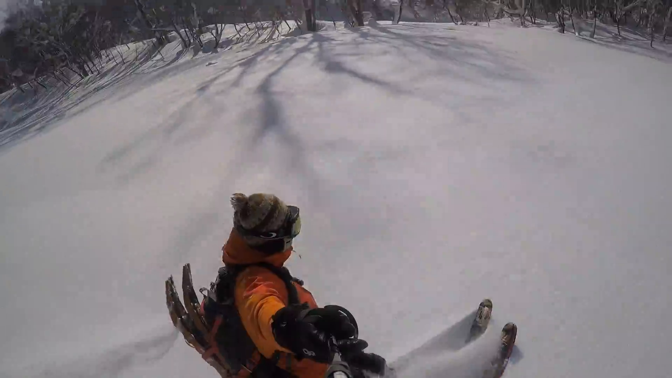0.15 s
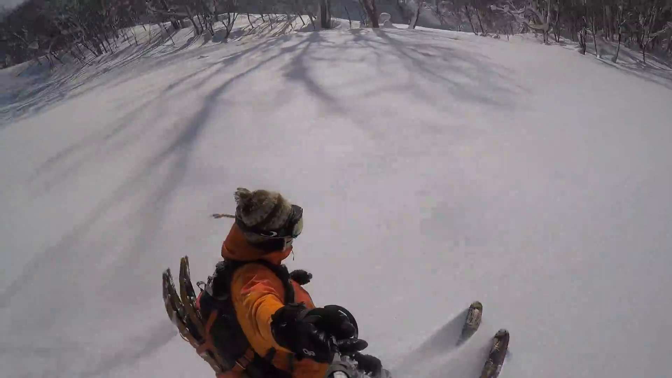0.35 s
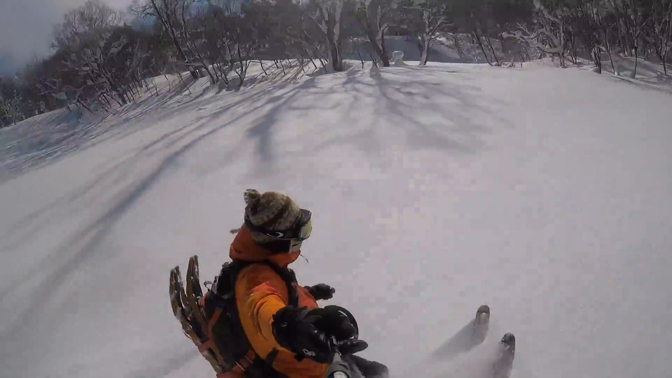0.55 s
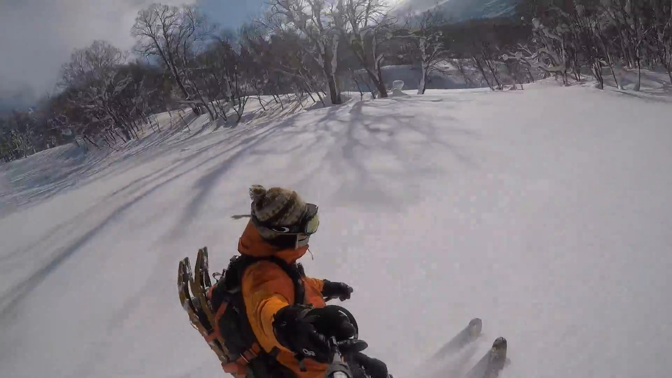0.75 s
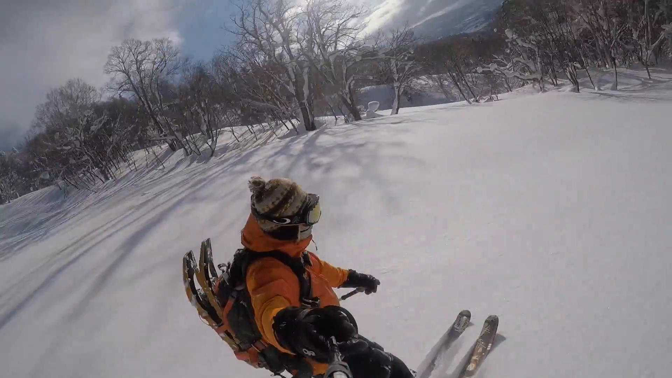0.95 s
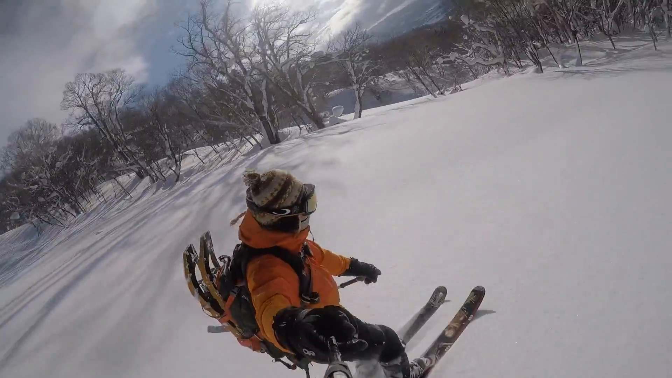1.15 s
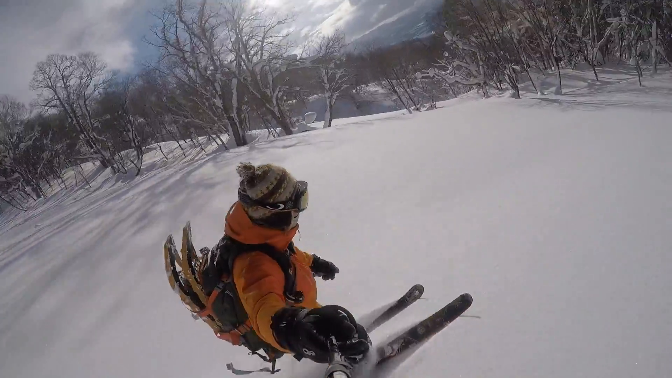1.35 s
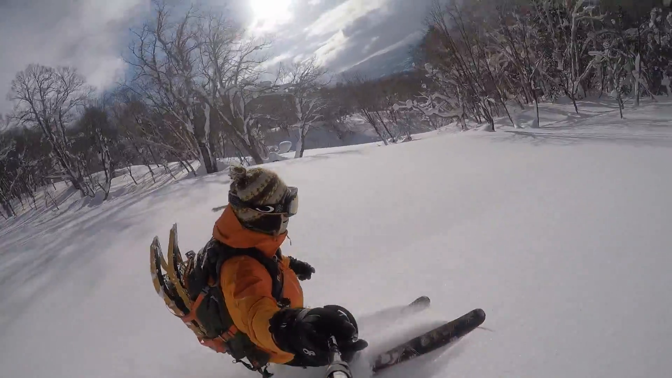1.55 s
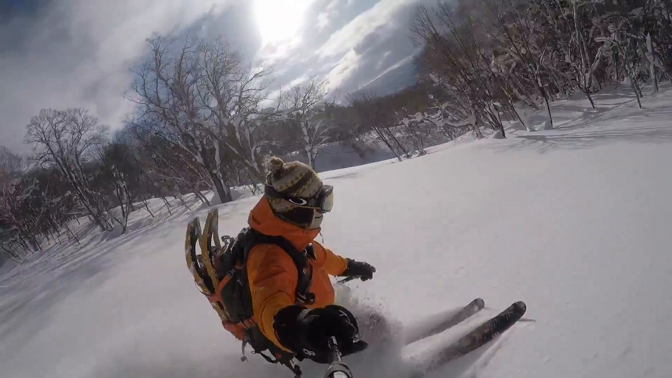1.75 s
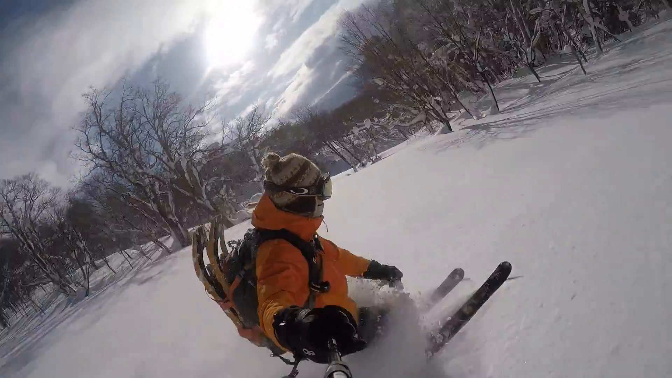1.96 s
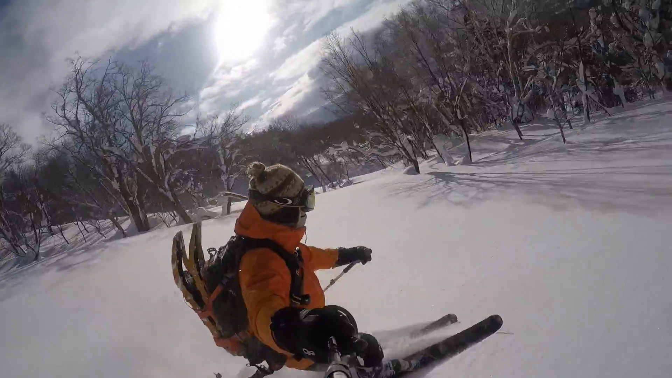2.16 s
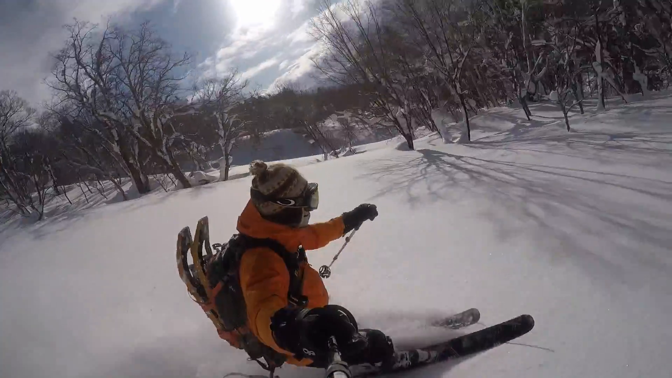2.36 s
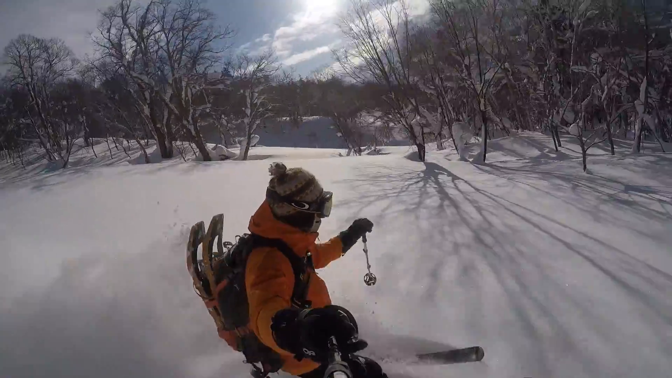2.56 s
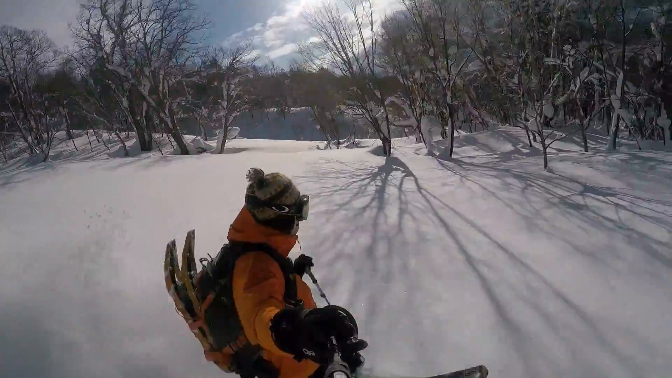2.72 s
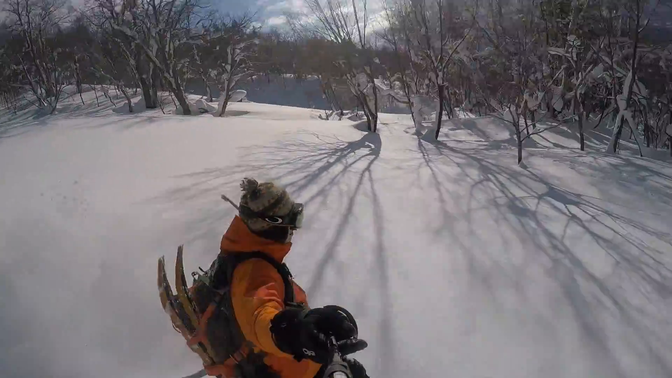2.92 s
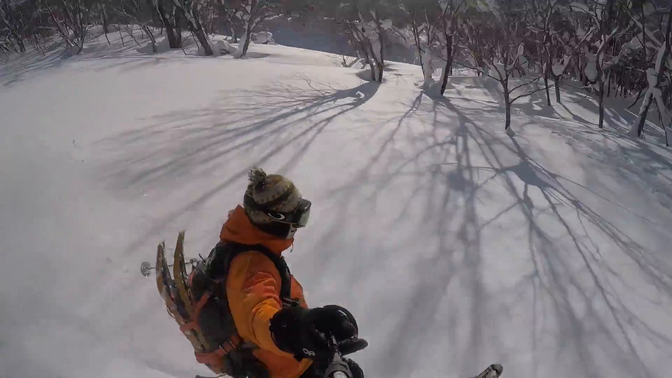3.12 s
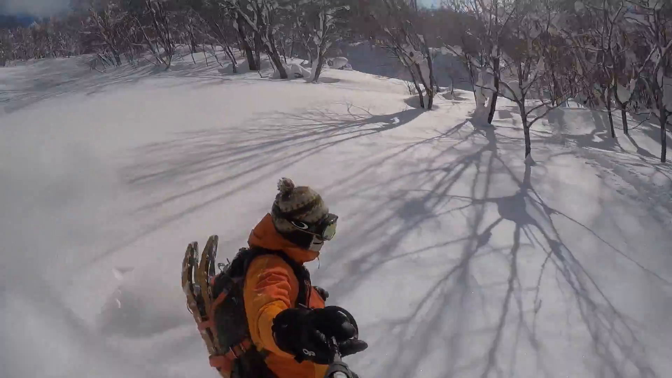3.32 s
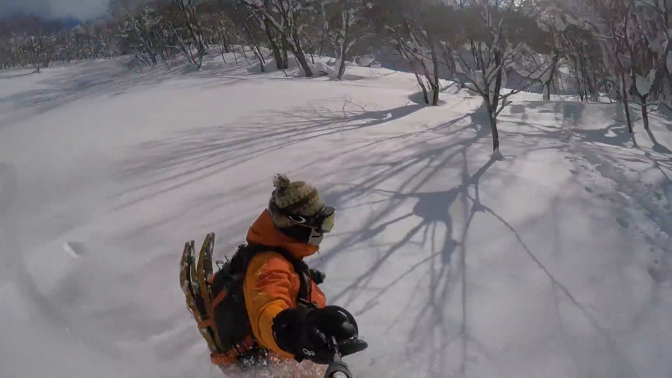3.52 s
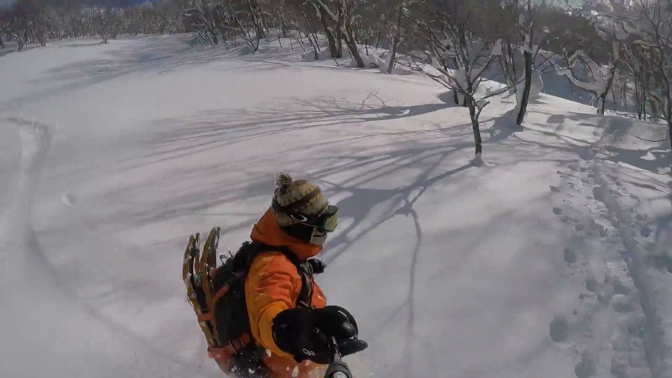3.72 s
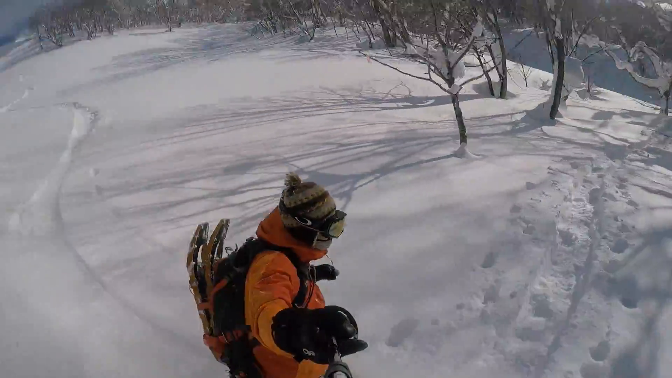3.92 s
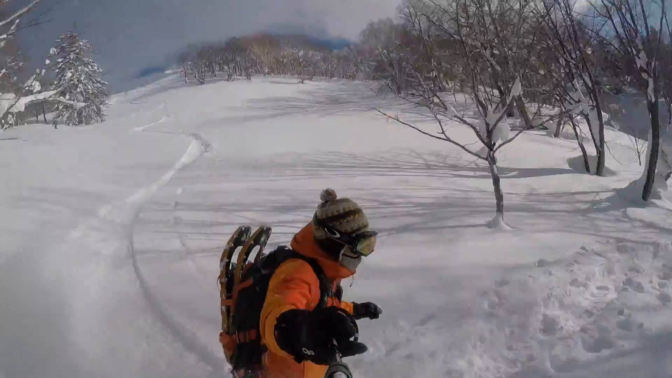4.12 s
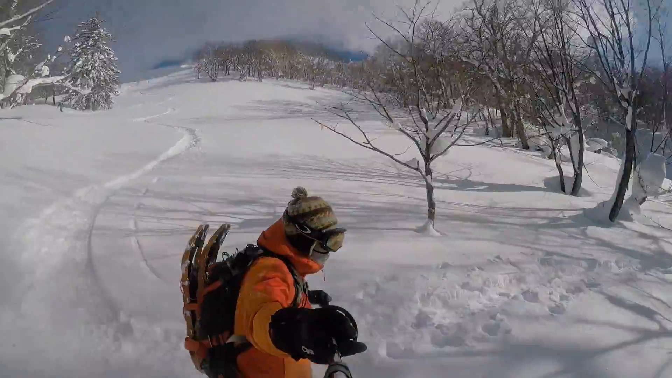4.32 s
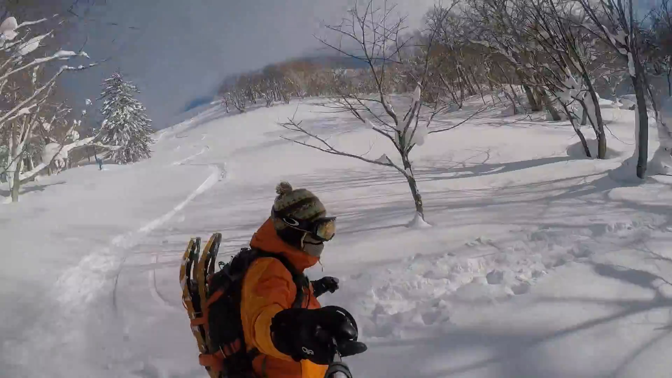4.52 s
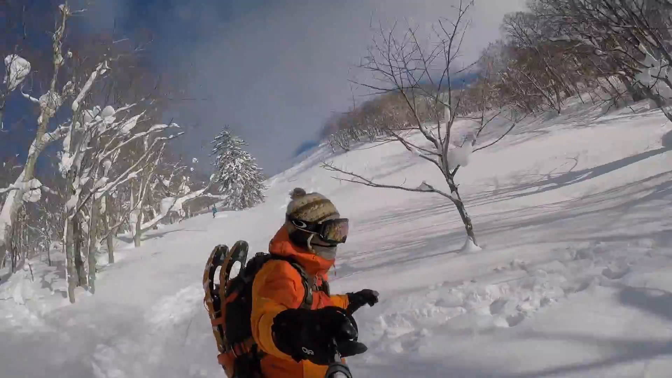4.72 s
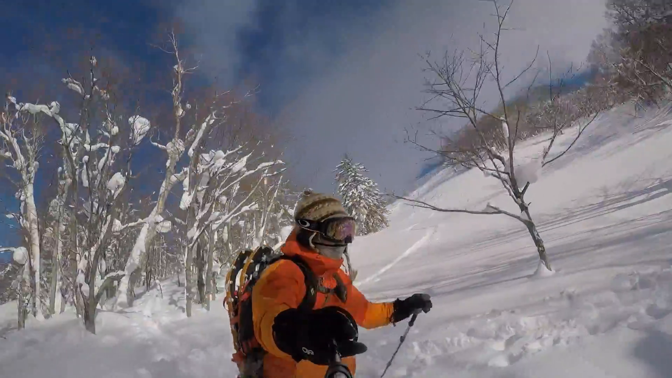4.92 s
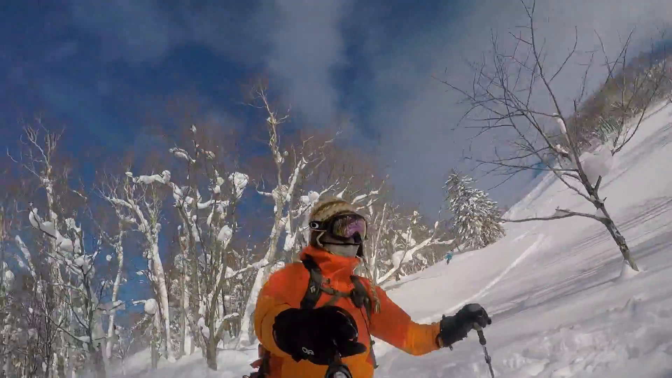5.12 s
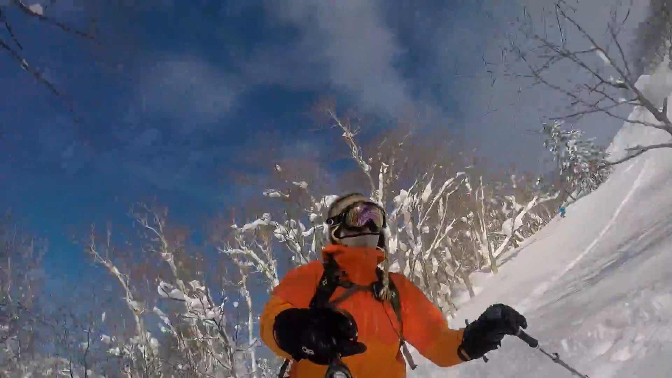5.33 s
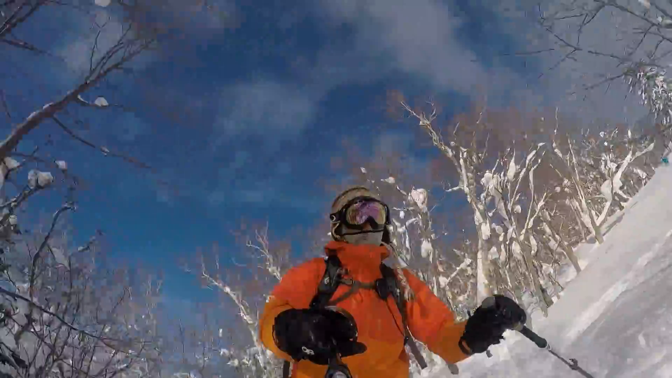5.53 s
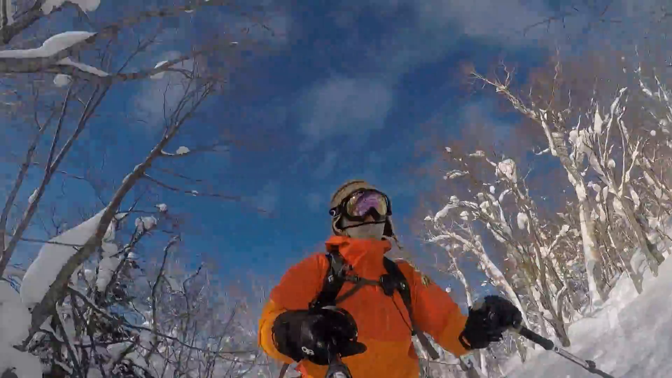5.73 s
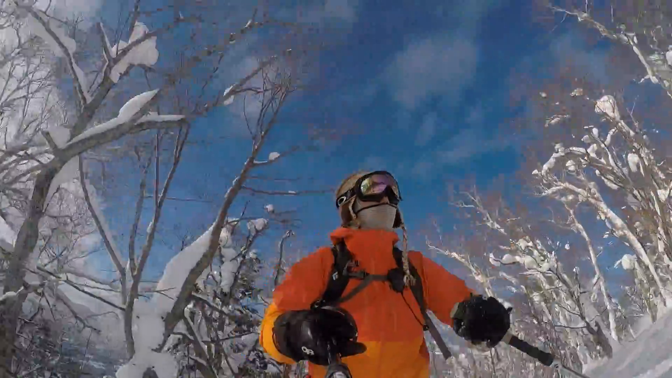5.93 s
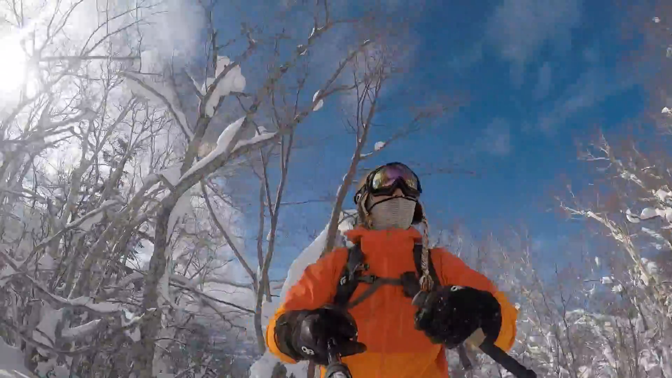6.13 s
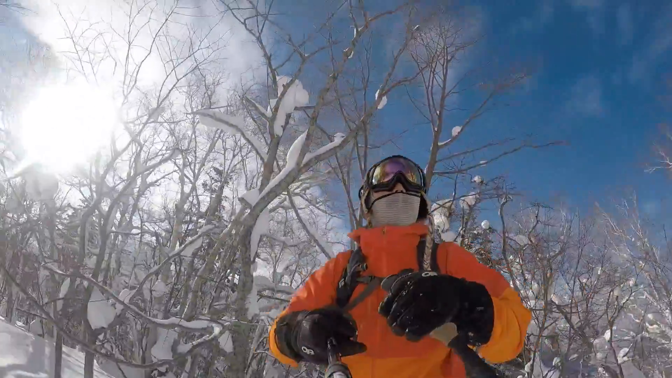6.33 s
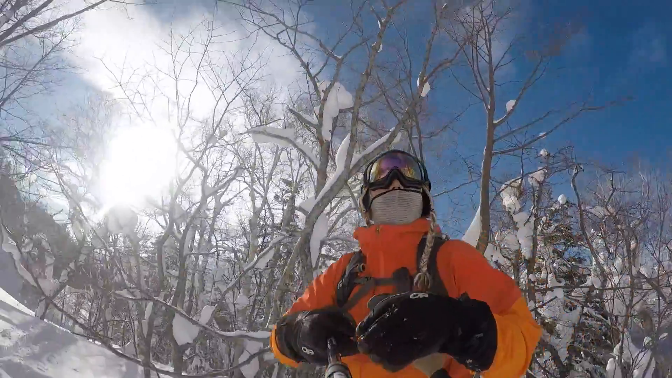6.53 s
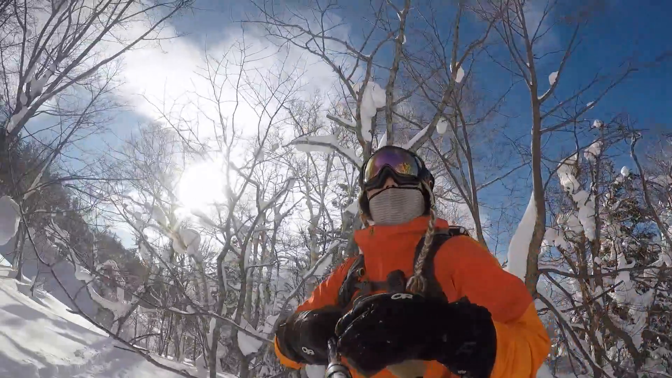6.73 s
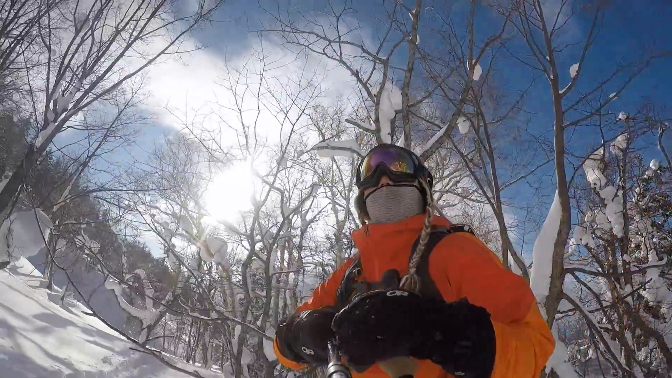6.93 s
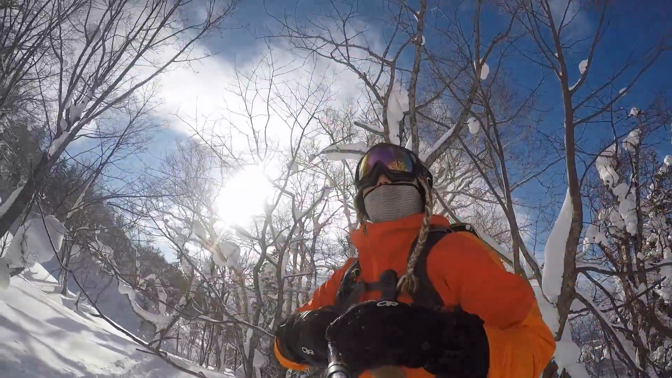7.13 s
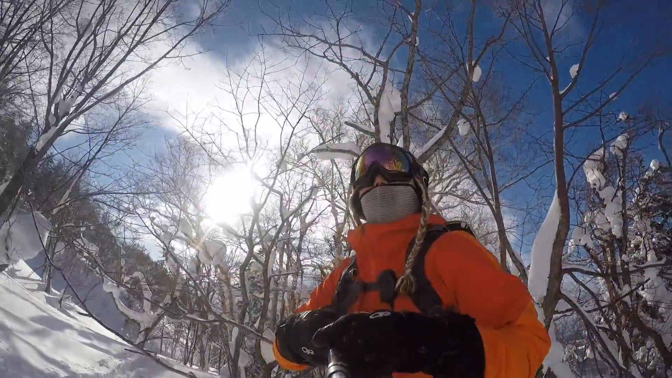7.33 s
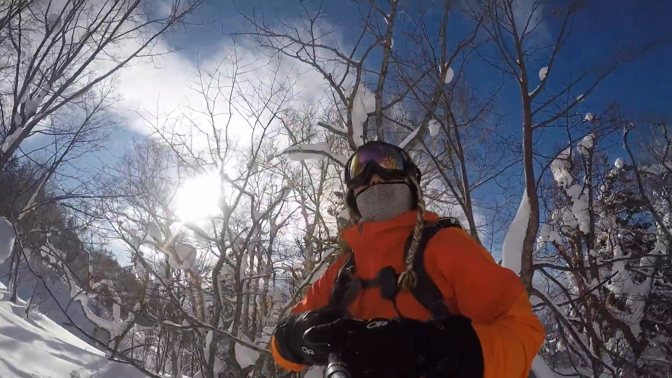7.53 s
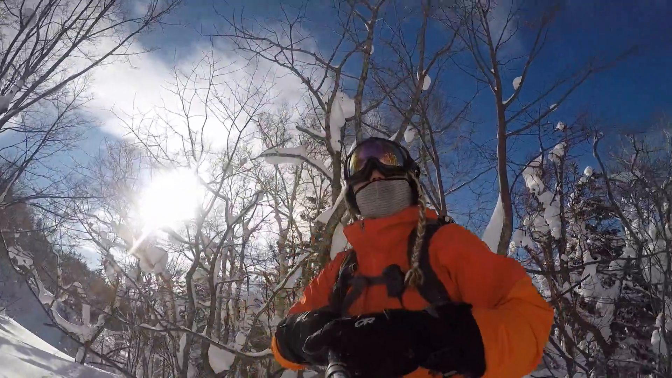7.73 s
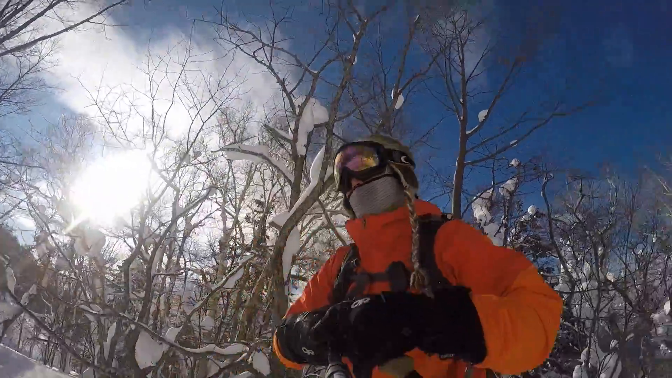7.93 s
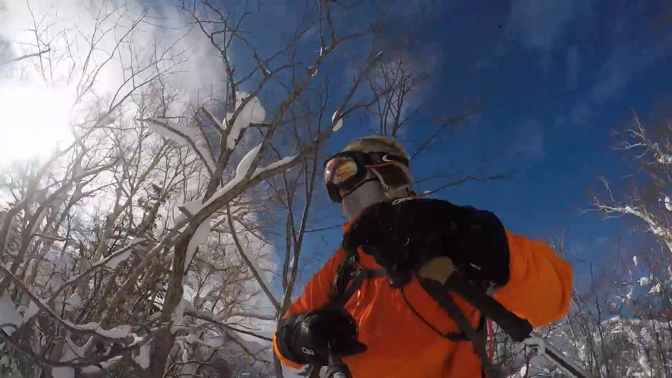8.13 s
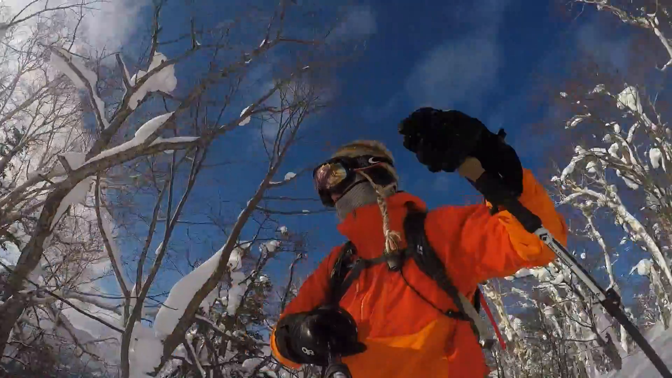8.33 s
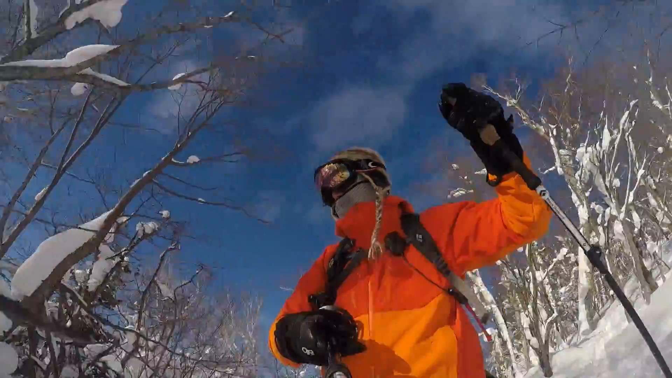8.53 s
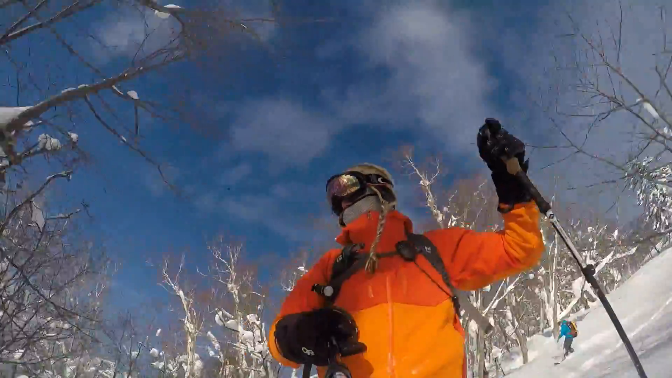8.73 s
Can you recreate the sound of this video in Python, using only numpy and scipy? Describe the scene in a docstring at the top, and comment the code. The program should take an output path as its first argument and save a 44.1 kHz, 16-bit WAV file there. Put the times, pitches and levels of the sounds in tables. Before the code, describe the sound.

Outdoors on a snowy slope, heard very close and dry from a camera on a hand-held pole. From 0 to about 4 seconds skis hiss through powder in soft grainy swells, strongest near 0, 0.4 and 3.1, with dull packing rush, low wind rumble and a wavering low hum. Small plastic clicks, muffled pole thumps and short snow crunches punctuate it, with a firmer knock near 1.9. A glove scuff and double knock come around 4.1, crunching snow at 4.4. The glide slows and fades by 5, leaving quiet wind, faint electronic hiss and slight jacket rustle. From 7.15 ribbed nylon zips over the pole, buzzing upward in pitch, until one sharp, very loud knock at 7.5; the rub drops away by 7.7. Cloth rustles near 7.8 and 8, then light clicks from 8.3 and a scuff with clicks at 8.7.

```python
"""Snow hisses under the skis of a skier turning through powder with a camera on a hand-held pole.
Filtered random grains make the snow and cloth; shaped noise and an unsteady sine make the wind and hum.
Decaying modes make the blows on the pole and clicks of its mount; resonant bands make the crunches.
As the skier slows, the jacket rustles, ribbed nylon zips over the pole as a train of snaps,
and one sharp knock shakes the case. A steady hiss and faint pulsing whine lie beneath."""
import sys
import numpy as np
from scipy import signal
from scipy.fft import rfft, irfft
from scipy.io import wavfile
from scipy.ndimage import uniform_filter1d, minimum_filter1d

SR = 44100
rng = np.random.default_rng(int(sys.argv[2]) if len(sys.argv) > 2 else 0)


def to_wav(s):
    """Save 16-bit WAV."""
    ch = np.atleast_2d(s).T  # columns
    pcm = np.round(np.clip(ch, -1, 1) * 32767)  # PCM
    wavfile.write(sys.argv[1], SR, pcm.astype(np.int16))


N = 390814
TIME = np.arange(N) / SR

# the skier slows to a gentle glide: time_s, speed_m_per_s
SKI_SPEED = [(0, 10), (.3, 9), (.9, 7.5), (1.4, 8), (2.3, 8), (3.05, 7.5), (3.4, 7), (3.7, 6.5), (4.2, 5.5),
             (5, 2)]
CRUISE_M_S = 8
# hiss as the skis are edged and released: peak_s, rise_s, fall_s, level_db
SKI_TURNS = [(0, .1, 0.15, -50.5), (.42, 0.26, 0.27, -49.5), (1.6, 0.14, .16, -53.5),
             (2.41, 0.16, 0.41, -54.5), (3.14, 0.23, 0.15, -51), (3.7, 0.33, 0.3, -61)]
# sheets of powder thrown past the camera: start_s, length_s, level_db
POWDER_SPRAYS = [(-.04, 0.094, -56), (1.44, 0.19, -60.5), (3.118, .225, -49)]
# spectrum of shearing snow crystals: frequency_hz, relative_db
SNOW_SPECTRUM = [(200, -23), (450, -21), (950, -10.5), (1280, -10.5), (1520, 0), (2050, 3.5), (2450, -1.5),
                 (2650, -3.5), (2900, -9), (3200, -4.5), (3650, -14), (4300, -12.5), (4900, -21),
                 (7400, -31.5), (14000, -48.5)]
# spectrum of thrown spray: frequency_hz, relative_db
SPRAY_SPECTRUM = [(1200, -35), (1800, 8.5), (2600, 0), (3250, 4), (3650, -4), (4300, 1), (4900, -13.5),
                  (5700, -7), (6700, -25.5), (9000, -37.5), (15000, -45)]
# spectrum of powder packing under the skis: frequency_hz, relative_db
PACKING_SPECTRUM = [(100, -9.5), (170, 1.5), (280, -4.5), (400, -15.5), (490, -2.5), (550, -8.5),
                    (750, -4.5), (830, -7), (980, -4), (1200, -18), (1500, -12.5), (3000, -45)]
# levels at cruising speed; amplitude grows as speed to these powers
RUN_DB, RUN_POWER = -69.5, 1.2
PACK_DB, PACK_POWER = -64.5, 2.9
SPRAY_SHARE_DB = -12  # fine spray that goes with all hiss
SPRAY_ATTACK_S, SPRAY_RELEASE_S = 0.039, 0.008

# gusts and swings of the pole through the air: peak_s, width_s, level_db
WIND_GUSTS = [(1.3, 0.27, -48), (1.82, .13, -41), (2.55, .07, -46), (3.3, .09, -42.5), (4.08, .11, -41.5),
              (4.65, .12, -48.5), (5.42, .09, -49), (5.85, .06, -48), (6.851, .14, -51.5),
              (7.35, .035, -38.5), (7.92, .05, -45), (8.76, .08, -50.5)]
# spectrum of wind rumble: frequency_hz, relative_db
WIND_SPECTRUM = [(10, -15), (20, -3), (45, 5.5), (80, 0), (100, -5), (125, -20.5), (160, -29), (220, -37),
                 (400, -38.5), (900, -80.5)]
# constant breeze, and headwind at cruising speed
BREEZE_DB, HEADWIND_DB, HEADWIND_POWER = -53.5, -45, 1.7
# eddies shed by the pole at cruising speed; they die away below the stall speed
EDDY_HZ, EDDY_DB, EDDY_DB_PER_OCTAVE, EDDY_STALL_M_S = 125.7, -56, -16, 4.9
EDDY_CALM_S, EDDY_CALM_DB = (.7, 2.3), -3  # the hum is weaker between these times

# movements of the arms that rub the jacket: peak_s, rise_s, fall_s, level_db
JACKET_RUBS = [(4.22, .15, 0.16, -70), (4.661, 0.055, 0.082, -65), (5.18, 0.044, 0.074, -75),
               (5.63, 0.055, 0.11, -74), (6.06, 0.018, .03, -75), (6.58, .04, .06, -69.5),
               (6.74, 0.033, 0.033, -67), (6.85, 0.014, 0.013, -60), (6.94, .02, 0.073, -67),
               (7.15, 0.039, 0.033, -67.5), (7.34, 0.035, .08, -54.5), (7.579, 0.089, 0.075, -63.5),
               (7.8, 0.056, 0.048, -54.5), (7.96, 0.027, 0.013, -51), (8.71, 0.018, 0.073, -54.5)]
# spectrum of jacket cloth: frequency_hz, relative_db
CLOTH_SPECTRUM = [(150, -22.5), (280, -9.5), (500, -12), (750, 0), (950, 2), (1280, -4), (1500, 3),
                  (1800, -0.5), (2050, -10), (2350, 2.5), (2700, -11.5), (3500, -13.5), (4200, -25.5),
                  (5100, -21), (6200, -37.5), (12000, -57.5)]
FIDGET_DB, FIDGET_SPREAD_DB, FIDGETS_PER_S = -85.5, 1, 6.4  # the jacket is never quite still

# spectrum of the steady hiss: frequency_hz, relative_db
HISS_SPECTRUM = [(120, -41), (200, -3.5), (443, -5), (775, -6.5), (1040, -17), (1600, 2.5), (2060, -22),
                 (2600, -5), (2850, -6.5), (8720, -15.5), (15000, -21)]
HISS_DB = -76
WHINE_HZ, WHINE_PULSE_HZ, WHINE_DB = 8560, 30, -97  # the camera's electronics

# blows through the pole: start_s, level_db, thump_relative_db, crack_relative_db
POLE_KNOCKS = [(0.705, -39.5, 9.5, -37), (1.516, -39, 2, -30), (1.745, -41.5, -15, -19),
               (1.917, -24.5, -9, -34), (2.856, -30.5, -24, -26), (3.831, -40, -8, -9),
               (4.143, -36, 8.5, -30), (4.1496, -32, 3.5, 2.5), (4.211, -48.5, 18.5, -30),
               (5.203, -53, -8, -17), (6.278, -54, 2, -27), (6.904, -48, -18, -20), (7.5323, -1, -7, -12.5)]
# modes of the case and pole when struck hard: frequency_hz, level_db, t60_s
POLE_MODES = [(170.6, -8, 0.12), (245, -13, 0.021), (285.4, -5, 0.063), (363, -8.5, 0.071),
              (509, -8.5, 0.081), (778, 1.5, 0.056), (929, 13, 0.028), (1008, 0.5, 0.054),
              (1127, -3, 0.061), (1416, -3, 0.047), (1750, 2, 0.024), (1807, -3, 0.033), (2240, -1, 0.022),
              (2630, -7, 0.027), (3080, -12.5, .016), (3405, -18.5, 0.015)]
# spectrum of a sharp contact: frequency_hz, relative_db
CRACK_SPECTRUM = [(500, -9), (1000, 5.5), (2700, 9.5), (4500, -10.5), (5800, -23.5), (6400, -22),
                  (8000, -26), (11000, -30), (15000, -37.5)]

# clicks of the mount and buckles: contact_s, level_db, treble_tilt_db_per_octave
MOUNT_CLICKS = [(1.3779, -29.5, 6.5), (1.7936, -35.5, -12), (2.133, -38.5, -11), (2.347, -29, 3.5),
                (2.4487, -29.5, 6.5), (2.9658, -35.5, -3), (3.3756, -28.5, 11), (3.872, -39.5, 2),
                (3.908, -43.5, 1), (3.9575, -30.5, 4.5), (4.321, -29, -1), (4.4836, -33.5, 1),
                (4.7244, -39.5, -13), (5.5764, -51.5, 10), (5.774, -44, -13.5), (5.8085, -47.5, -6),
                (6.976, -40, -16), (8.344, -44.5, 14), (8.3535, -39.5, 13), (8.4299, -37.5, -3),
                (8.6893, -26.5, -2), (8.7257, -28, -12)]
# modes of the mount when clicked: frequency_hz, level_db, t60_s
MOUNT_MODES = [(756, -20, 0.013), (1578, -8.5, 0.033), (1653, 0, 0.021), (2740, -3.5, 0.015),
               (2577, -1.5, 0.023), (3290, -16, 0.021), (4500, -18.5, 0.012), (4990, -30, 0.022)]
TICKS_PER_S, TICK_DB, TICK_SPREAD_DB, TICK_TILT_DB = 1.2, -59, 2.5, 6  # faint chance ticks of loose gear
CLICK_LIFT_DB = 9  # added to every click and tick

# snow crunching against the case and pole: start_s, length_s, level_db, low_ring_relative_db
SNOW_CRUNCHES = [(1.731, 0.036, -47.5, -9), (2.341, 0.046, -43.5, -5.5), (2.848, 0.033, -39.5, -9),
                 (3.37, 0.028, -44, -5.5), (4.424, 0.09, -51.5, -12.5), (4.454, 0.17, -50.5, -8),
                 (4.713, 0.035, -57.5, 5)]
# resonances of the case under crunching snow: frequency_hz, width_hz, level_db
CASE_BANDS = [(761, 47, 8), (1533, 204, 6.5), (2670, 74, 10.5), (3074, 150, 0.5), (4390, 150, -11.5)]
FRACTURES_PER_S, FRACTURE_SPREAD_DB = 1800, 2.2

# gloves scuffing on the grip: start_s, length_s, level_db
GLOVE_SCUFFS = [(4.134, 0.044, -43.5), (4.182, 0.066, -53), (8.689, 0.11, -46)]
# spectrum of glove on grip: frequency_hz, relative_db
GLOVE_SPECTRUM = [(100, -23), (230, -4), (500, -3.5), (920, 3), (1280, -2.5), (1600, 3), (2100, -9),
                  (2650, -5), (3600, -19.5), (4400, -32), (5250, -18.5), (5700, -42.5), (12000, -67)]

# ribbed nylon sliding: time_s, rib_rate_hz, level_db, roughness_0_to_1
NYLON_SLIDE = [(7.155, 211.2, -71.5, .08), (7.26, 223.7, -68, 0.3), (7.34, 246, -54.5, .45),
               (7.42, 275, -56.5, .35), (7.5, 325.2, -49, .2), (7.535, 342.3, -47.5, .22),
               (7.57, 326, -54, .22), (7.615, 232.6, -53, .9), (7.69, 187, -68, 0.8)]
# spectrum of rubbed nylon: frequency_hz, relative_db
NYLON_SPECTRUM = [(200, -23.5), (450, 1.5), (640, -4), (1000, -6.5), (1300, -31), (1650, -0.5),
                  (2250, -1.5), (2850, -3), (3400, -5), (4700, -10), (5600, -30), (7000, -23.5),
                  (8200, -43.5), (9700, -34), (14000, -49.5)]
THREAD_LAGS_S, THREAD_SMEAR = (.00043, .00079, .00131), .6
SING_HZ, SING_WIDTH_HZ, SING_GAIN = 3000, 160, .8  # the tube's resonance
SING_LIGHT_GAIN, SING_FADE_S = 6.8, (7.24, 7.34)  # freer before the cloth presses on and damps it

TOP_HZ = 15200  # upper edge of the recorded band


def undb(db):
    """Decibels are logarithmic: convert them to amplitude gain."""
    return 10 ** (np.asarray(db) / 20)


def unit(x):
    """Mean power sets level: scale to rms 1."""
    return x / np.sqrt(np.mean(x ** 2))


def together(gains):
    """Unrelated noises add in power."""
    return np.sqrt(sum(g ** 2 for g in gains))


def curves(table):
    """Linear interpolation turns each column of a timed table into a curve."""
    s, *columns = np.transpose(table)
    return [np.interp(TIME, s, c) for c in columns]


def during(table):
    """A smoothed gate opens and closes softly around a table's time span."""
    inside = (TIME >= table[0][0]) & (TIME <= table[-1][0])
    return uniform_filter1d(1. * inside, size=2000)


def colour(x, points):
    """A folded cepstrum gives a minimum-phase, causal filter of the given response."""
    hz, db = np.transpose(points)
    f = np.maximum(np.fft.rfftfreq(8192, 1 / SR), 1)
    response_db = np.interp(np.log(f), np.log(hz), db)
    cepstrum = irfft(np.log(undb(response_db)))
    half = len(cepstrum) // 2
    cepstrum[1:half] *= 2
    cepstrum[half + 1:] = 0
    impulse = irfft(np.exp(rfft(cepstrum)))[:half]
    return signal.fftconvolve(x, impulse)[:len(x)]


def band(x, hz, width):
    """A second-order resonance passes its centre at gain 1."""
    return signal.lfilter(*signal.iirpeak(hz, hz / width, fs=SR), x)


def walk(rate):
    """Averaging random steps gives smooth motion of rms 1."""
    k = max(int(SR / rate), 1)
    steps = np.repeat(rng.standard_normal(N // k + 1), k)[:N]
    return unit(uniform_filter1d(steps, k))


def grains(per_s, spread_db):
    """Friction and fracture are random impulses of very unequal size."""
    hit = rng.random(N) < per_s / SR
    size = undb(spread_db * np.minimum(rng.exponential(size=N), 4))
    return unit(hit * rng.standard_normal(N) * size)


def bump(s, rise, fall):
    """A hyperbolic secant swells to 1 at time s, with exponential flanks."""
    u = (TIME - s) / np.where(TIME < s, rise, fall)
    return 1 / np.cosh(np.clip(u, -20, 20))


def swell(s, length):
    """One rub has a quick rise and a slower release."""
    u = np.clip((TIME - s) / length, 0, 2)
    return np.interp(u, [0, .15, .6, 1, 1.4], [0.0092, 0.92, 0.91, 0.068, 0.0012])


def ring(modes, t, scatter_db, detune):
    """A struck body is a sum of decaying modes, weighted anew by each blow; peak 1."""
    hz, db, t60 = np.transpose(modes)[:, :, None]
    size, shift = rng.standard_normal((2, len(modes), 1))
    decay = np.exp(-np.log(1000) * t / t60)
    waves = np.sin(2 * np.pi * hz * (1 + detune * shift) * t) * decay
    y = np.sum(undb(db + scatter_db * size) * waves, axis=0)
    return y / np.abs(y).max()


def add(out, s, sound):
    """Superposition: mix a short sound in at time s."""
    i = int(np.clip(s * SR, 0, N))
    out[i:i + len(sound)] += sound[:N - i]


def pace():
    """Ski and wind sounds scale with speed, given as a share of cruising speed."""
    speed, = curves(SKI_SPEED)
    return np.maximum(speed, 0) / CRUISE_M_S


def skis():
    """Crystals shear under the skis, powder packs with a dull rush, and hard turns throw a grainy spray."""
    speed = pace()
    turning = [undb(db) * bump(s, rise, fall) for s, rise, fall, db in SKI_TURNS]
    hiss = together([undb(RUN_DB) * speed ** RUN_POWER] + turning)
    thrown = np.zeros(N)
    for s, length, db in POWDER_SPRAYS:
        corners = [0, SPRAY_ATTACK_S, length, length + SPRAY_RELEASE_S]
        thrown += undb(db) * np.interp(TIME - s, corners, [0, 1, 1, 0])
    shear = unit(colour(grains(20000, 3.1), SNOW_SPECTRUM)) * undb(0.83 * walk(35))
    spray = unit(colour(grains(6000, 3.7), SPRAY_SPECTRUM)) * undb(2.5 * walk(60))
    packing = unit(colour(grains(5000, 1.8), PACKING_SPECTRUM)) * undb(PACK_DB + 0.27 * walk(15))
    shear_level = together([hiss, 0.77 * thrown])
    spray_level = together([undb(SPRAY_SHARE_DB) * hiss, thrown])
    return shear * shear_level + spray * spray_level + packing * speed ** PACK_POWER


def wind():
    """Turbulence buffets the microphone, and eddies shed by the pole hum at a pitch set by speed."""
    speed = pace()
    gusts = [undb(db) * bump(s, width, width) for s, width, db in WIND_GUSTS]
    headwind = undb(HEADWIND_DB) * speed ** HEADWIND_POWER
    flow = together([undb(BREEZE_DB), headwind] + gusts)
    air = unit(colour(rng.standard_normal(N), WIND_SPECTRUM))
    # slow air makes mostly large, deep eddies
    deep = signal.sosfiltfilt(signal.butter(3, 85, fs=SR, output="sos"), air)
    fine = np.minimum(flow / undb(-40.5), 1) ** 0.28
    rumble = (deep + fine * (air - deep)) * flow * undb(1.5 * walk(11))
    eddy_hz = EDDY_HZ * speed * (1 + 0.0254 * walk(30))
    hum = unit(np.sin(2 * np.pi * np.cumsum(eddy_hz) / SR) * undb(3.7 * walk(14)))
    shedding = np.clip(speed * CRUISE_M_S - EDDY_STALL_M_S, 0, 1)
    calm = uniform_filter1d(1. * ((TIME > EDDY_CALM_S[0]) & (TIME < EDDY_CALM_S[1])), size=SR // 4)
    octaves = np.log2(np.maximum(speed, .5))
    hum_db = EDDY_DB + EDDY_DB_PER_OCTAVE * octaves + EDDY_CALM_DB * calm
    return rumble + hum * shedding * undb(hum_db)


def jacket():
    """Rubbed cloth crinkles in many small stick-slip events."""
    fidget = undb(FIDGET_DB + FIDGET_SPREAD_DB * walk(FIDGETS_PER_S))
    rubs = [undb(db) * bump(s, rise, fall) for s, rise, fall, db in JACKET_RUBS]
    crinkle = unit(colour(grains(4500, 1.8), CLOTH_SPECTRUM))
    return crinkle * together([fidget] + rubs) * undb(1.5 * walk(70))


def camera():
    """Electronic noise is a steady broadband hiss and a narrow band pulsed as a faint whine."""
    hiss = unit(colour(rng.standard_normal(N), HISS_SPECTRUM)) * undb(HISS_DB)
    pulse = (1 + np.cos(2 * np.pi * WHINE_PULSE_HZ * TIME)) ** 2
    whine = band(band(rng.standard_normal(N), WHINE_HZ, 250), WHINE_HZ, 250)
    return hiss + unit(pulse * whine) * undb(WHINE_DB)


def knocks():
    """Impacts excite the modes of the pole, which sways with a low thump."""
    out, t = np.zeros(N), np.arange(SR // 4) / SR
    thump_hz, rise_s = 68, .0155
    thump_envelope = (t / rise_s * np.exp(1 - t / rise_s)) ** 5.4
    thump = np.sin(2 * np.pi * thump_hz * (t - .0042)) * thump_envelope
    for s, db, thump_db, crack_db in POLE_KNOCKS:
        crack = colour(rng.standard_normal(len(t)) * np.exp(-t / 0.0012), CRACK_SPECTRUM)
        crack /= np.abs(crack).max()
        # the padded grip dulls the blow
        body = signal.lfilter(*signal.butter(2, 2700, fs=SR), ring(POLE_MODES, t, 0.13, 0.0047))
        body /= np.abs(body).max()
        add(out, s, undb(db) * (body + undb(thump_db) * thump + undb(crack_db) * crack))
    return out


def ticks():
    """Chance contacts fall uniformly in time: rows like those of MOUNT_CLICKS."""
    rows = []
    for when, size, tilt in rng.random((int(TICKS_PER_S * N / SR), 3)):
        db = TICK_DB + TICK_SPREAD_DB * (2 * size - 1)
        rows.append((when * TIME[-1], db, TICK_TILT_DB * (2 * tilt - 1)))
    return rows


def clicks():
    """Repeated contact excites the mount's modes: loose gear touches, strikes and rattles briefly."""
    out, t = np.zeros(N), np.arange(SR // 10) / SR
    # a plastic contact takes a moment to build up
    contact = 1 - np.exp(-t / 0.0013)
    for s, db, tilt_db in MOUNT_CLICKS + ticks():
        modes = [(hz, gain + tilt_db * np.log2(hz / MOUNT_MODES[2][0]), t60)
                 for hz, gain, t60 in MOUNT_MODES]
        # a light touch, the main contact, then two ever weaker rebounds: delay_s, relative_db
        gaps = .003 + .005 * rng.random(3)
        contacts = [(-gaps[0], -18), (0, 0), (gaps[1], -14), (gaps[1] + gaps[2], -22)]
        for delay, drop_db in contacts:
            grit = colour(rng.standard_normal(len(t)) * np.exp(-t / 0.0015), CRACK_SPECTRUM)
            grit /= np.abs(grit).max()
            strike = contact * (ring(modes, t, 2.1, 0.022) + 0.36 * grit)
            add(out, s + delay, undb(db + drop_db + CLICK_LIFT_DB) * strike)
    return out


def crunches():
    """Dense fractures of packed snow excite the resonances of the case."""
    fractures = grains(FRACTURES_PER_S, FRACTURE_SPREAD_DB)
    low, *upper = [undb(db) * band(band(fractures, hz, width), hz, 4 * width)
                   for hz, width, db in CASE_BANDS]
    # part of each fracture arrives directly and keeps its broad, rough edge
    direct = unit(colour(fractures, CLOTH_SPECTRUM))
    upper = unit(unit(sum(upper)) + 0.089 * direct)
    low = unit(low)
    return sum(undb(db) * swell(s, length) * (upper + undb(low_db) * low)
               for s, length, db, low_db in SNOW_CRUNCHES)


def gloves():
    """Sliding friction makes dense grains as gloves scuff the grip."""
    level = sum(undb(db) * swell(s, length) for s, length, db in GLOVE_SCUFFS)
    return level * unit(colour(grains(5000, 1.68), GLOVE_SPECTRUM))


def smear(x):
    """All-pass dispersion spreads each snap in time, as threads of a rib do not slip all at once."""
    for lag_s in THREAD_LAGS_S:
        b = np.r_[THREAD_SMEAR, np.zeros(int(lag_s * SR)), 1]
        x = signal.lfilter(b, b[::-1], x)
    return x


def nylon_zip():
    """Periodic excitation: each rib of the weave gives one snap, so pitch follows the sliding speed."""
    hz, db, rough = curves(NYLON_SLIDE)
    rough = np.clip(rough, 0, 1)
    ribs = np.cumsum(hz * (1 + .002 * walk(150))) / SR
    # a narrow pulse at every whole rib; slack cloth mostly hisses
    offset = (ribs - np.round(ribs)) * SR / hz  # in samples
    pulses = np.sinc(offset) * np.exp(-(offset / 4) ** 2)
    snaps = unit(pulses) * undb(0.705 * walk(210))
    friction = np.sqrt(1 - rough ** 2) * smear(snaps) + rough * rng.standard_normal(N)
    rub = colour(friction, NYLON_SPECTRUM)
    # a second fold meets the pole a moment later; its shifting lag favours now one harmonic, now another
    lag_s = 0.001105 + 0.00014 * walk(12)
    rub = unit(rub + .5 * np.interp(TIME - lag_s, TIME, rub))
    # the tube sings when a harmonic glides through its resonance
    sing = np.interp(TIME, SING_FADE_S, [SING_LIGHT_GAIN, SING_GAIN])
    tube = band(rub, SING_HZ, SING_WIDTH_HZ)
    singing_rub = (rub + sing * tube) / together([1, sing * tube.std()])
    return singing_rub * undb(db) * during(NYLON_SLIDE)


def scene():
    """Direct sounds superpose at one microphone, with no echo from the open snow."""
    steady = skis() + wind() + jacket() + camera()
    contacts = knocks() + clicks() + crunches() + gloves() + nylon_zip()
    return (steady + contacts)[None]


def record(dry):
    """Fast gain reduction limits the loudest peaks, and a low-pass filter cuts the top."""
    ceiling = .265
    gain = ceiling / np.maximum(np.abs(dry), ceiling)
    gain = uniform_filter1d(minimum_filter1d(gain, size=11), size=11)
    return signal.sosfilt(signal.ellip(8, .2, 70, TOP_HZ, fs=SR, output="sos"), dry * gain)


dry = scene()
out = record(dry)
to_wav(out)
```